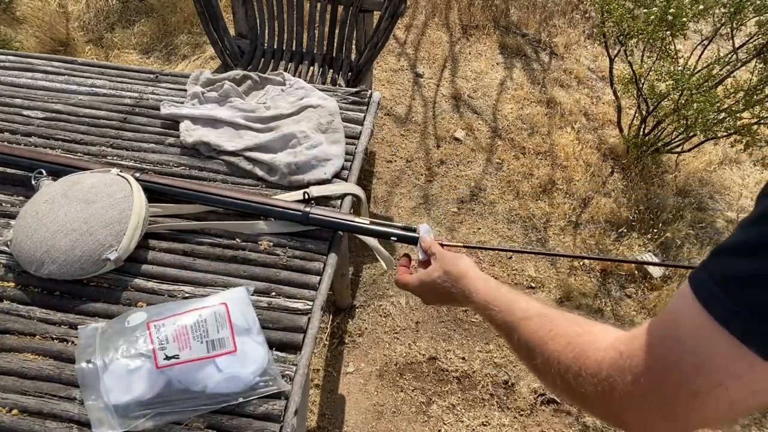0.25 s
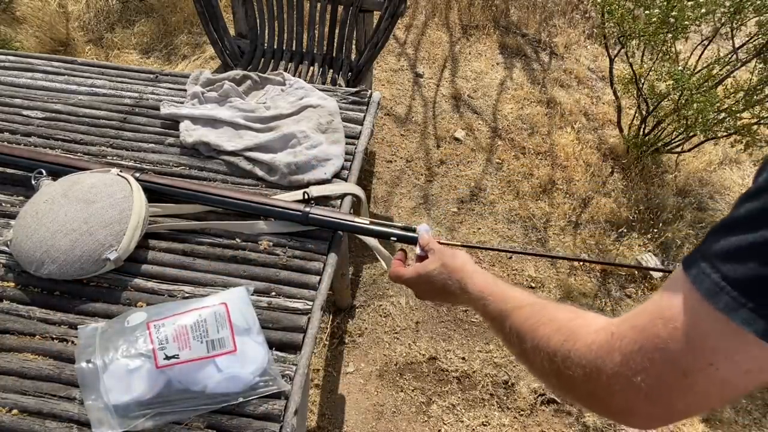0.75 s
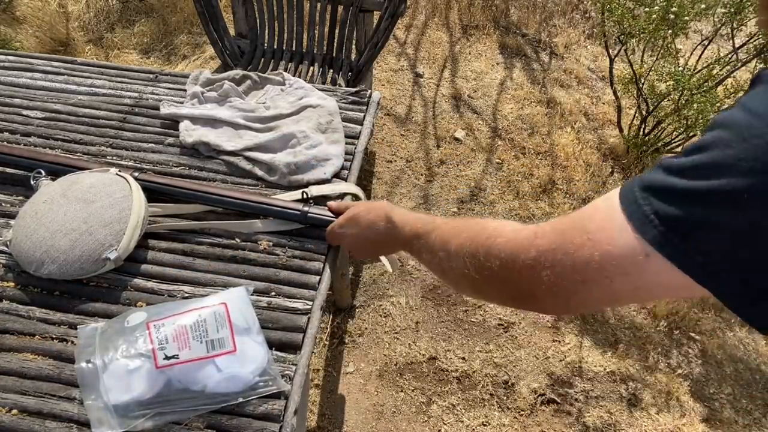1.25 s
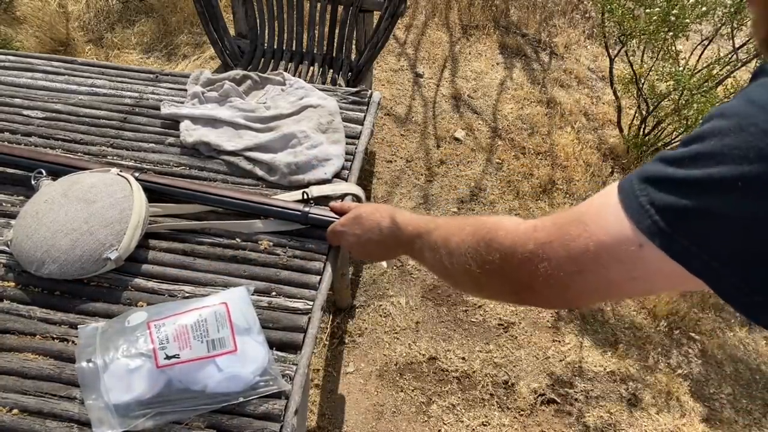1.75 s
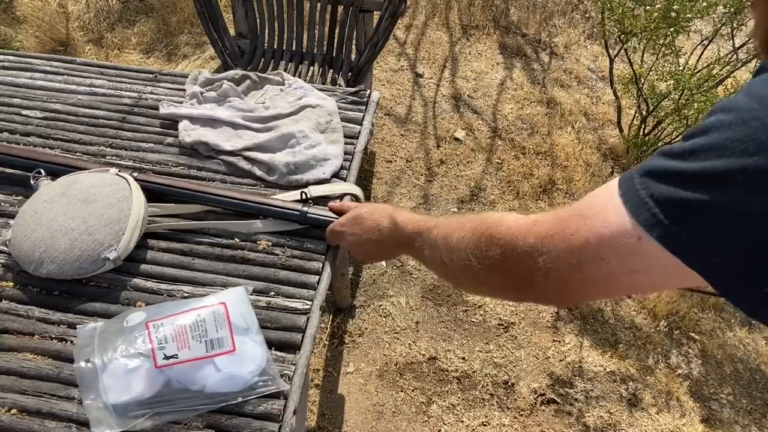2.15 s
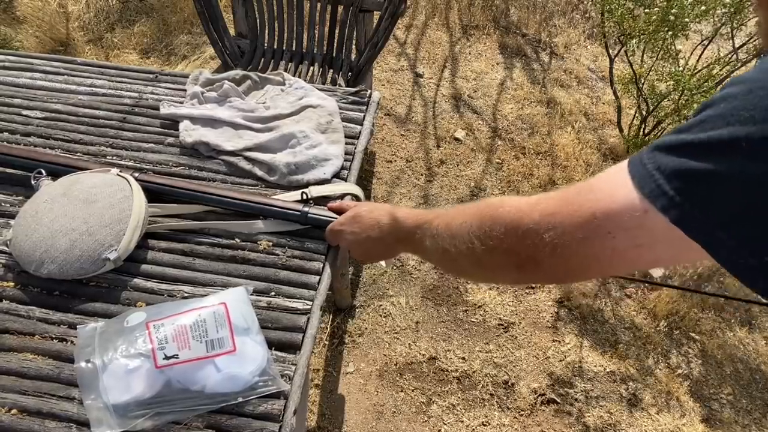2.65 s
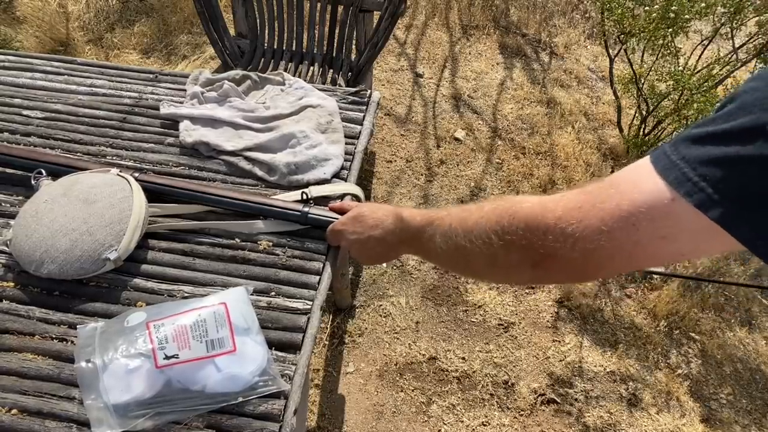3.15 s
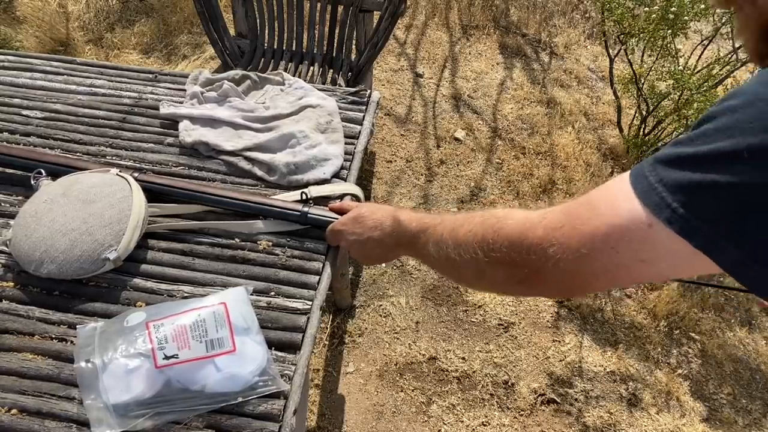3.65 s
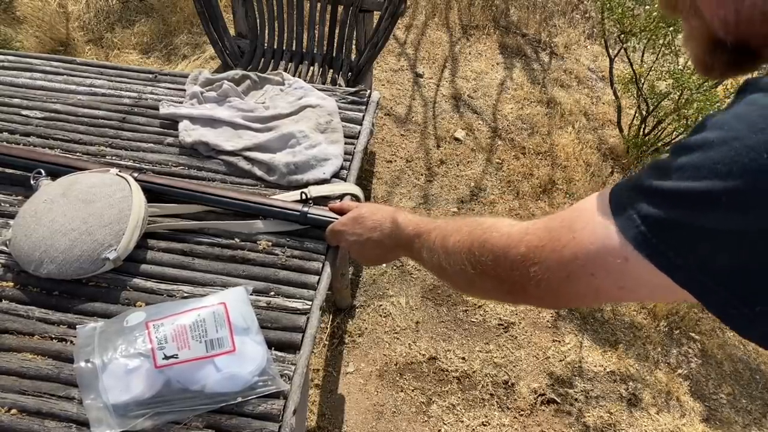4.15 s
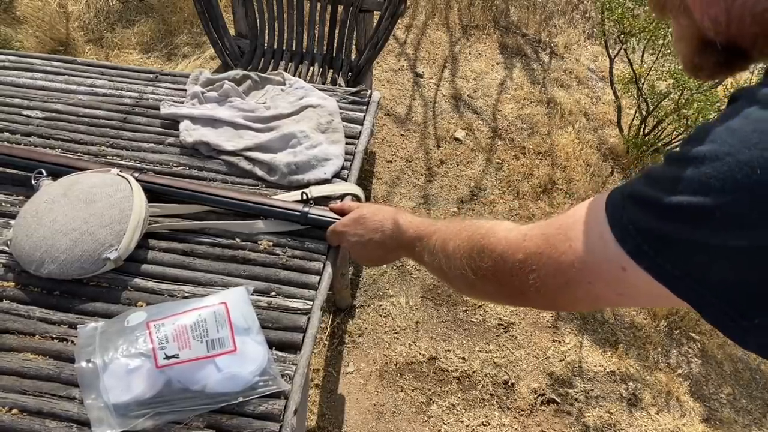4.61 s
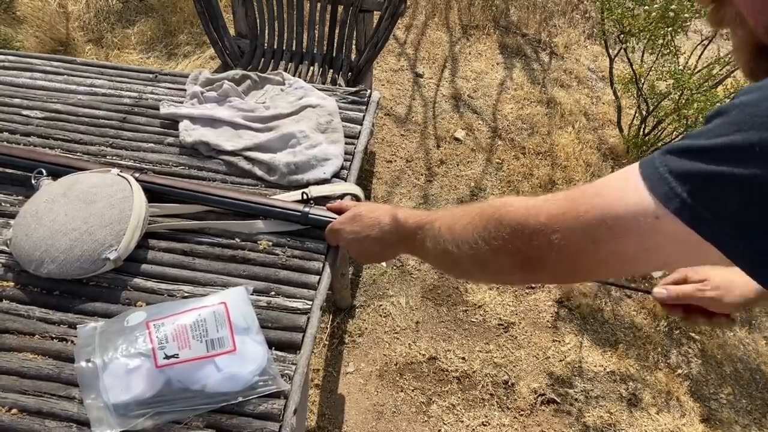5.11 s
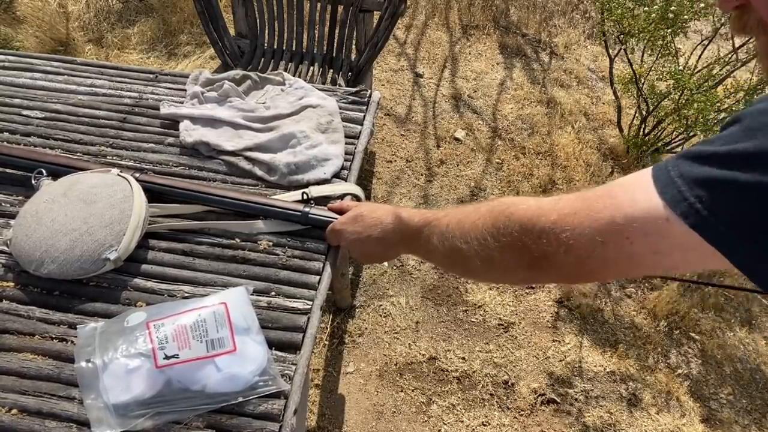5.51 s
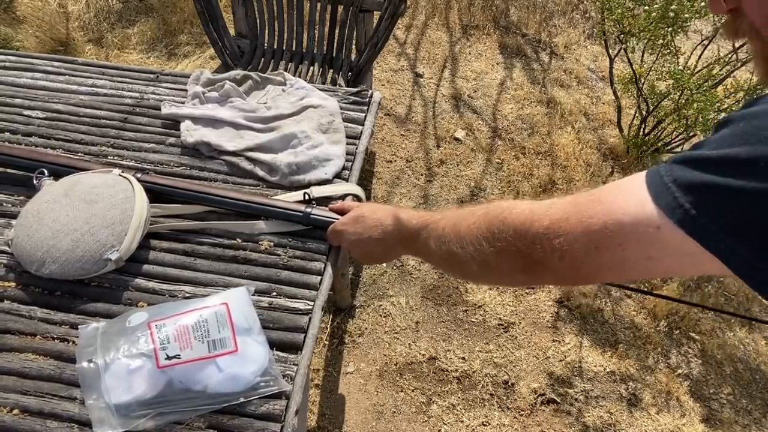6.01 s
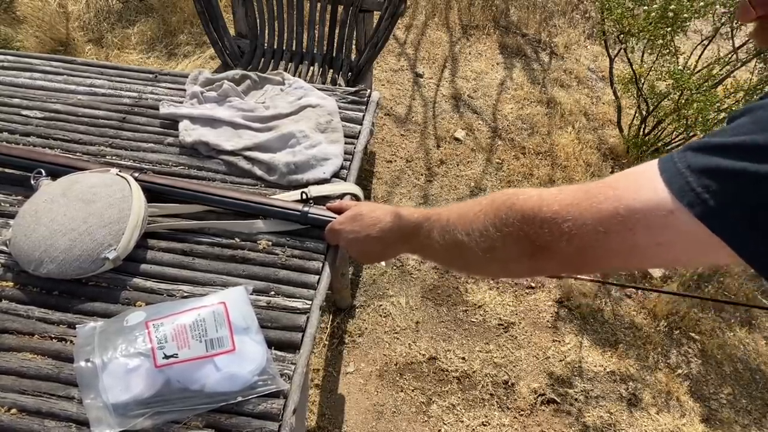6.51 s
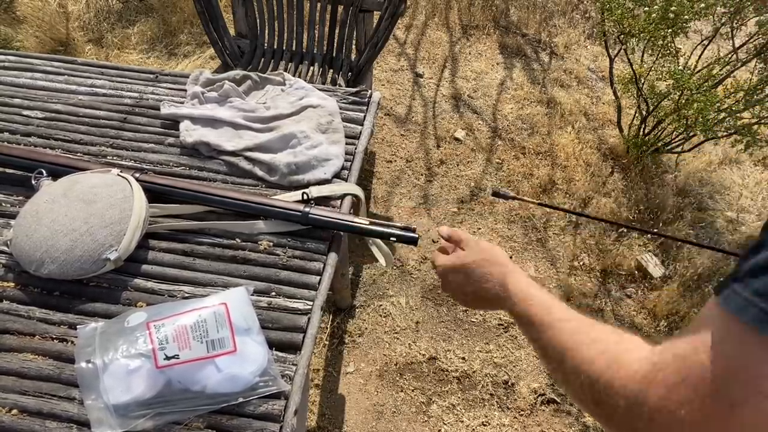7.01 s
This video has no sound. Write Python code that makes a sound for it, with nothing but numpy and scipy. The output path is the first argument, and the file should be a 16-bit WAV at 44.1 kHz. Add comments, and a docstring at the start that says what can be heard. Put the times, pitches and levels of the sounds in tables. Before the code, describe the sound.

A close microphone in a dry open place catches small steel clicks, fingers shifting cloth and dull wooden bumps as a cleaning rod is started in a barrel. Grating strokes with metallic catches come and go, with a bright knock midway. The last stroke ends in an explosive, distorted suction pop, by far the loudest sound, leaving only quiet air and a faint drone.

```python
"""A cloth patch on a thin rod is pushed into a rifle barrel on a slatted table outdoors, worked up and down, pulled out.
Taps, catches and scrapes are noise through resonances of steel barrel and bending rod; cloth is coloured noise.
The patch leaves the muzzle with a pop: dying sines for the air in the bore, then a noisy snap that overloads the
microphone. Wooden slats bump; noise-modulated far traffic hums under a faint hiss, with a few sine insect notes."""
import sys
import numpy as np
from scipy import signal
from scipy.fft import rfft, irfft, next_fast_len
from scipy.io import wavfile
from scipy.ndimage import uniform_filter1d

SR = 44100
rng = np.random.default_rng(int(sys.argv[2]) if len(sys.argv) > 2 else 0)


def store_pcm(level_fs):
    """Save levels as 16-bit WAV."""
    pcm = np.round(np.clip(level_fs, -1, 1) * 32767).astype(np.int16)
    wavfile.write(sys.argv[1], SR, np.atleast_2d(pcm).T)


def volts_from_decibels(level):
    """Turn decibel levels (scalar or array-like) into linear amplitude factors."""
    exponent = np.asarray(level, float) / 20
    return 10 ** exponent


N = 320342


def evened(x):
    """Scales x to rms 1."""
    return x / np.sqrt(np.mean(x ** 2) + 1e-20)


def peaked(x):
    """Scales x so that its loudest 2 ms have rms 1."""
    return x / np.sqrt(uniform_filter1d(x ** 2, size=88).max())


def read(points, hz):
    """Interpolates (Hz, value) points over log frequency."""
    f, value = np.transpose(points)
    return np.interp(np.log(hz + 1), np.log(f + 1), value)


def add(mix, start_s, sound):
    """Adds sound into mix in place, cut at the end."""
    part = mix[round(start_s * SR):][:len(sound)]
    part += sound[:len(part)]


def coloured(x, points):
    """Filters x by a dB spectrum."""
    size = next_fast_len(len(x))
    gain = volts_from_decibels(read(points, np.fft.rfftfreq(size, 1 / SR)))
    return irfft(rfft(x, size) * gain, size)[:len(x)]


def ringing(modes, levels_db, t):
    """One dying sine a mode."""
    return np.array([volts_from_decibels(db - 60 * t / t60) * np.sin(2 * np.pi * hz * t)
                     for (hz, t60), db in zip(modes, levels_db)])


# Still-air spectrum. Each row: frequency in Hz, relative density in dB per Hz.
AIR_COLOUR = [(15, -48), (25, -25.5), (77, -2), (101, 0), (209, -5.5), (289, -12), (444, -15), (741, -17.5),
              (1620, -23.5), (2000, -23.5), (8800, -33), (13500, -33.5), (15500, -36)]


def air():
    """Still-air hiss: steady coloured noise."""
    return volts_from_decibels(-56.5) * evened(coloured(rng.standard_normal(N), AIR_COLOUR))


# Far traffic. Each row: time in seconds, level in dB before a 3.5 dB cut.
TRAFFIC_LEVEL = [(0, -54.5), (.528, -53), (.62, -68), (.74, -56), (.94, -71), (1.05, -56), (1.79, -60),
                 (2.11, -52), (4.13, -63), (4.8, -66), (5.14, -61.5), (5.65, -61), (6.3, -60), (7.26, -60)]


def traffic():
    """A far drone: slow noise on both quadratures makes one pitch waver."""
    drone_hz, wander_hz = 105.8, 18
    s, db = np.transpose(TRAFFIC_LEVEL)
    t = np.arange(N) / SR
    pole = np.exp(-np.pi * wander_hz / SR)
    fuzz = signal.lfilter([1], [1, -pole], rng.standard_normal((2, N)))
    turn = 2 * np.pi * drone_hz * t
    drone = evened(fuzz[0] * np.cos(turn) + fuzz[1] * np.sin(turn))
    return volts_from_decibels(np.interp(t, s, db) - 3.5) * drone


# Steel rod and barrel. Each row: mode in Hz, ungripped width in Hz, mean gain in dB.
STEEL_MODES = [(444, 83, 3.5), (675, 27, 8.5), (777, 8.3, 10), (1060, 43, 5.5), (1216, 94, 3.5),
               (1359.5, 9.8, 10.5), (1538, 25, 6), (1834, 47, -2), (2120, 21, -1), (2320, 28, 7.5),
               (2603, 76, -1), (2832, 200, 6), (3120, 70, 5.5), (3680, 74, -3), (3770, 73, 2.5),
               (4500, 92, 3.5), (5520, 110, 1.5), (8000, 80, -16), (9500, 200, -5.5), (10800, 470, -2)]


def steel(hz, strike_db, damping_hz=0):
    """Direct sound plus each mode, as hard as this contact point drives it; a grip widens the modes."""
    f, width, db = np.transpose(STEEL_MODES)[..., None]
    width = width + damping_hz
    modes = volts_from_decibels(db + strike_db[:, None]) * 1j * width * hz / (f ** 2 - hz ** 2 + 1j * width * hz)
    return 0.98 + modes.sum(0)


TREBLE_LOSS_HZ = 9000  # above about this pitch a touch dies twice as fast


def rod(hz, t60_s):
    """Bending modes, pitch as (order + 1/2) squared, flattened by shear; a chance contact point drives each."""
    m = np.arange(10, 42)[:, None] + .5
    f = 8.48 * m ** 2 / np.sqrt(1 + 1.75e-4 * m ** 2)
    width = np.log(1000) / np.pi / t60_s * (1 + (f / TREBLE_LOSS_HZ) ** 2)
    drive = np.cos(np.pi * m * rng.random())
    return (drive * 1j * width * hz / (f ** 2 - hz ** 2 + 1j * width * hz)).sum(0)


def touch(db, ring_hz, tick_db, t60_s, wood_db, rise_s, rod_db):
    """A short rattle of contact noise rings the barrel; its first blow rings the rod."""
    strike_s, after_db, after_t60_s = 0.00184, -27.5, .16
    t = np.arange(8192) / SR
    hz = np.fft.rfftfreq(len(t), 1 / SR)
    noise = rng.standard_normal(len(t)) * np.minimum(t / rise_s, 1)
    top_hz = max(ring_hz, 1000)
    tilt_db = read([(200, wood_db - 22.5), (430, wood_db), (top_hz, 0),
                    (max(top_hz + 1, 3200), 0.35 * tick_db + 3.5), (5800, tick_db + 5.0), (7500, tick_db - 5.5),
                    (12000, tick_db - 11), (15500, tick_db - 14.5)], hz)
    # the struck spot favours one region
    tilt = volts_from_decibels(tilt_db) * (1 + 1.23 / (1 + ((hz - ring_hz) / 350) ** 2))
    body = steel(hz, 2.5 * rng.standard_normal(len(STEEL_MODES)), 1.2 / t60_s)
    # rifle and table shake on faintly after the touch
    fade = volts_from_decibels(-60 * t / (0.84 * t60_s)) + volts_from_decibels(after_db - 60 * t / after_t60_s)
    bright = hz ** 2 / (hz ** 2 + TREBLE_LOSS_HZ ** 2)
    rattle = rfft(noise * fade) * (1 - bright) + rfft(noise * fade ** 2) * bright
    barrel = irfft(rattle * tilt * body)
    blow = rfft(noise * np.exp(-t / strike_s))
    bend = irfft(blow * tilt * rod(hz, min(0.087, 1.15 * t60_s)))
    both = peaked(barrel) + volts_from_decibels(rod_db) * peaked(bend)
    return volts_from_decibels(db) * peaked(both[:6000])


TAP_RISE_S, TAP_ROD_DB = 0.00093, -2
# Loose rod on barrel and muzzle. Each row: start in seconds, level in dB, strongest ring in Hz,
# relative tick brightness in dB, nominal t60 in seconds (contact noise takes 0.84 of it).
TAP_ROWS = [(.494, -55, 2400, -5, .04), (.917, -55.5, 2200, -24, .08), (.954, -49, 2190, -33, .045),
            (1.117, -50.5, 1900, -18, 0.041), (1.174, -51.5, 2500, 6, .015), (1.195, -51, 2100, -16, .05),
            (1.243, -46.5, 2330, 1, 0.015), (1.332, -48, 3120, -18, 0.06), (1.352, -33, 2410, -18, 0.055),
            (1.388, -51, 2600, -20, 0.037), (1.492, -46, 2565, -22, 0.06), (1.832, -49.5, 1960, -33, 0.057),
            (1.885, -49.5, 2398, -7.5, 0.38), (2.032, -40, 2857, -21, 0.029), (2.067, -46, 2373, -22, .035),
            (2.279, -34, 1540, -15, 0.084), (2.298, -32, 3050, -13.5, .12), (2.361, -36.5, 2770, -2, 0.038),
            (2.431, -40, 2895, -8, 0.047), (2.436, -26.5, 2680, -21, 0.031),
            (2.499, -51.5, 4000, 17, 0.027), (2.548, -38.5, 2340, -18, 0.083),
            (2.624, -46.5, 2530, -23, .14), (2.662, -47.5, 2870, -12, 0.043), (2.775, -38, 2650, -9, 0.055),
            (2.82, -48.5, 2800, -9, 0.042), (2.85, -43, 2320, -34, .077), (2.883, -44, 2510, -11, .063),
            (2.9, -38.5, 1900, -29, 0.061), (2.965, -39.5, 2800, -9, 0.089),
            (2.978, -28.5, 2430, -25, 0.052), (3.0534, -27, 950, -36, 0.0089),
            (3.058, -46, 1250, -36, .045), (3.145, -43.5, 1290, -43, 0.083),
            (3.893, -35.5, 2180, -17, 0.06), (4.147, -37.5, 2210, -21, 0.056),
            (4.44, -38, 2476, -12, 0.065), (4.4463, -18, 2750, -8, 0.059), (4.45, -16, 2500, -11, .04),
            (4.5207, -33.5, 2810, -25, .05), (4.525, -30, 2370, -23, 0.049),
            (4.579, -37.5, 2370, -32, 0.057), (4.675, -45.5, 2570, -34.5, 0.047),
            (4.783, -49.5, 2300, -24.5, 0.26), (4.805, -38, 2600, -17, 0.044),
            (4.8193, -42, 4500, -3, .007), (5.468, -34.5, 2612, -6, 0.062), (5.659, -27, 2290, -17, 0.081),
            (5.894, -38.5, 1980, -21.5, 0.06), (5.943, -46, 2200, -12.5, 0.09),
            (5.951, -44, 1660, -12.5, .044), (5.974, -44.5, 2800, -17, .02),
            (6.015, -22.5, 2320, -14.5, 0.025), (6.06, -51.5, 2450, -15, 0.049),
            (6.08, -43, 1490, -21, .103), (6.507, -36.5, 910, -15.5, 0.068),
            (6.625, -48.5, 3110, -11, 0.055), (6.748, -45, 2360, -11, 0.079)]


def taps():
    """The loose rod knocks barrel and muzzle; harder knocks ring more steel, less wood."""
    out = np.zeros(N)
    for s, db, hz, tick_db, t60_s in TAP_ROWS:
        wood_db = -4.5 - 0.3 * (db + 39.5)
        add(out, s, touch(db, hz, tick_db, t60_s, wood_db, TAP_RISE_S, TAP_ROD_DB))
    return out


def cloth(rows, colour, patchy_db):
    """Cloth noise under a stroke, more or less patchy."""
    s, db = np.transpose(rows)
    t = np.arange(s[0], s[-1], 1 / SR)
    patchy = volts_from_decibels(patchy_db * evened(uniform_filter1d(rng.standard_normal(len(t)), size=400)))
    noise = evened(coloured(patchy * rng.standard_normal(len(t)), colour))
    return s[0], volts_from_decibels(np.interp(t, s, db)) * noise * signal.windows.tukey(len(t), 600 / len(t))


# Cloth spectrum. Each row: frequency in Hz, relative density in dB per Hz.
CLOTH_COLOUR = [(290, -55), (500, -6), (611, 2.5), (686, -22), (748, -6), (2040, -2), (15500, -21)]
# Fingers on the cloth. Each row: start in seconds, length in seconds, peak level in dB.
SHIFT_ROWS = [(1.05, 0.07, -46), (1.14, .07, -56.5), (1.229, 0.032, -52.5), (1.337, .07, -59),
              (1.592, .07, -56), (2.02, 0.037, -65), (2.133, 0.063, -52), (2.231, 0.053, -51.5),
              (2.773, 0.044, -62), (2.868, 0.035, -59), (2.965, 0.044, -61), (6.729, 0.058, -54.5)]


def shifts():
    """Fingers shift the cloth: each shift swells and fades."""
    out = np.zeros(N)
    for start, length, db in SHIFT_ROWS:
        swell = [(start, db - 11), (start + 0.34 * length, db), (start + length, db - 11)]
        add(out, *cloth(swell, CLOTH_COLOUR, patchy_db=0.0))
    return out


def jiggles():
    """Faint chance touches of the rod while the patch is started in the muzzle."""
    first_s, last_s, count = 1.55, 2.7, 7
    out = np.zeros(N)
    for when, size, spot in rng.random((count, 3)):
        sound = touch(-61 + 6 * size, 1810 * (.5 + spot), tick_db=-10, t60_s=0.037, wood_db=-4.5,
                      rise_s=TAP_RISE_S, rod_db=TAP_ROD_DB)
        add(out, first_s + when * (last_s - first_s), sound)
    return out


# Patch held to the muzzle. Each row: time in seconds, level in dB.
RUSTLE_LEVEL = [(1.7, -80), (1.762, -64), (2.2, -63), (2.45, -59.5), (2.76, -67), (2.95, -71), (3.1, -74)]


def rustle():
    """Continuous patchy cloth noise while the patch is held to the muzzle."""
    out = np.zeros(N)
    add(out, *cloth(RUSTLE_LEVEL, CLOTH_COLOUR, patchy_db=3.5))
    return out


# Stock on the slats. Each row: start in seconds, level in dB before 4.5 dB gain and envelope, pitch in Hz.
BUMP_ROWS = [(2.203, -43.5, 397), (2.237, -44, 406), (2.363, -43.5, 458), (2.438, -40, 404),
             (2.517, -46.5, 445), (2.621, -53, 433), (3.487, -43.5, 495), (3.584, -41, 485)]


def bumps():
    """The stock bumps the slats: a soft push rings one wooden slat as a dying sine."""
    out, t = np.zeros(N), np.arange(4000) / SR
    push = 1 - np.exp(-t / 0.0032)
    for s, db, hz in BUMP_ROWS:
        add(out, s, volts_from_decibels(db + 4.5 - 60 * t / 0.058) * push * np.sin(2 * np.pi * hz * t))
    return out


# Push on the rod, a list a stroke. Each row: time in seconds, 800-3500 Hz friction level in dB.
STROKE_LEVELS = [
    [(2.28, -52), (2.305, -40), (2.326, -36), (2.333, -50), (2.341, -34), (2.36, -52)],
    [(3.15, -59.5), (3.2, -42), (3.27, -34), (3.3, -41), (3.335, -44), (3.37, -46.5), (3.548, -48),
     (3.584, -35.5), (3.654, -45), (3.83, -57), (3.93, -49), (4.084, -57), (4.41, -59), (4.45, -46)],
    [(4.86, -65), (5.042, -47), (5.152, -41), (5.23, -42.5), (5.255, -49), (5.35, -43), (5.375, -60),
     (5.41, -61), (5.455, -55.5), (5.53, -60)],
    [(6.07, -60), (6.13, -46), (6.155, -60), (6.2, -44.5), (6.22, -38.5), (6.29, -40.5), (6.31, -57),
     (6.33, -68), (6.4, -69)],
]
# Stroke colours, a list a stroke. Each row: frequency in Hz, relative density in dB per Hz.
STROKE_COLOURS = [
    [(180, -54), (300, -26), (1800, -29), (2270, 0), (3380, -23), (3890, -14), (12000, -38), (15600, -72),
     (22000, -120)],
    [(180, -50), (300, -10.5), (1540, -6.5), (2000, -10.5), (2300, -5.5), (2490, -11.5), (3180, -9.5),
     (12000, -43), (15600, -75), (22000, -120)],
    [(180, -46), (300, -9), (712, -12.5), (769, 0), (857, -17), (1830, -2.5), (3440, -14), (12000, -42),
     (15600, -74), (22000, -120)],
    [(180, -60), (300, -30.5), (402, -3), (629, -20), (669, -10), (2300, -3), (12000, -40), (15600, -74),
     (22000, -120)],
]


def slide(rows, colour):
    """Friction noise catches and slips in lumps; the modes wax and wane as the contact moves along the bore."""
    scrape_hz, roam, rumble_db, catches_per_s, lump_s = 1900, 0.19, 0.5, 260, 0.0036
    s, db = np.transpose(rows)
    t = np.arange(s[0], s[-1], 1 / SR)
    db = np.interp(t, s, db)
    sizes = volts_from_decibels(2.5 * np.minimum(rng.exponential(1, len(t)), 3))
    impulses = sizes * (rng.random(len(t)) < catches_per_s / SR)
    decayed = signal.lfilter([1], [1, -np.exp(-1 / (lump_s * SR))], impulses)
    lumps = uniform_filter1d(decayed, size=90)
    chatter = volts_from_decibels(0.08 * np.clip(db + 47, 0, 20) - 4.5)  # a harder push chatters more
    drive = rng.standard_normal(len(t) + 512) * np.pad(1 + chatter * lumps, (0, 512))

    hz, at, z = signal.stft(drive, SR, nperseg=512, noverlap=384)
    wander = evened(uniform_filter1d(rng.standard_normal(len(at)), size=20))
    centre = scrape_hz * np.exp(roam * wander)
    near = 1 + 1.0 / (1 + ((hz[:, None] - centre) / 400) ** 2)
    low = np.clip(np.log2(900 / (hz + 1)), 0, 1)[:, None]  # table rumble under the scrape
    z = z * near * volts_from_decibels(read(colour, hz)[:, None] + low * rumble_db)
    rub = signal.istft(z, SR, nperseg=512, noverlap=384)[1]

    hz, out = np.fft.rfftfreq(len(rub), 1 / SR), 0
    for k in range(3):  # three contact regions cross-fade
        share = np.cos(np.pi * (np.arange(len(rub)) / SR * 2.577 + k / 3))
        barrel = steel(hz, 2.7 * rng.standard_normal(len(STEEL_MODES)), damping_hz=21.9)
        body = barrel + volts_from_decibels(7.5) * rod(hz, 0.06)
        out = out + irfft(rfft(rub * share) * body, len(rub))
    out = out[:len(t)]
    band = signal.butter(2, [800, 3500], "band", fs=SR, output="sos")
    steady = np.sqrt(uniform_filter1d(signal.sosfilt(band, out) ** 2, size=9000))
    return s[0], volts_from_decibels(db) * out / steady * signal.windows.tukey(len(t), 400 / len(t))


def slides():
    """The rod scrapes the bore in every stroke."""
    out = np.zeros(N)
    for rows, colour in zip(STROKE_LEVELS, STROKE_COLOURS):
        add(out, *slide(rows, colour))
    return out


# Tight patch on the bore wall, a list a stroke. Each row: time in seconds, level in dB.
WIPE_LEVELS = [
    [(3.17, -70), (3.3, -56.5), (3.508, -53), (3.66, -53), (3.718, -49), (3.8, -52), (4.068, -54),
     (4.252, -55), (4.29, -60), (4.44, -56.5)],
    [(4.8, -73), (4.82, -58), (4.87, -65.5), (5.12, -61), (5.145, -54), (5.216, -57), (5.344, -55),
     (5.39, -66)],
    [(6.09, -70), (6.11, -59), (6.178, -72), (6.244, -63), (6.3, -72), (6.4, -57)],
]
# Wipe spectrum. Each row: frequency in Hz, relative density in dB per Hz.
WIPE_COLOUR = [(350, -26), (600, -7), (809, -10.5), (1180, -1.5), (1660, -9.5), (2310, -7.5), (2500, -8),
               (3200, -4.5), (5510, -10), (8860, -22), (12100, -23), (15500, -34.5)]
# Delayed copies of the wipe, which comb its spectrum. Each row: total delay in seconds, gain in dB.
WIPE_ECHOES = [(.0039, -7), (.0043, -9)]


def wipes():
    """The tight patch wipes the bore wall: cloth noise, direct and in two delayed copies."""
    out, wipe = np.zeros(N), np.zeros(N)
    for rows in WIPE_LEVELS:
        add(wipe, *cloth(rows, WIPE_COLOUR, patchy_db=1.5))
    for delay_s, db in [(0.0019, 0.02), *WIPE_ECHOES]:
        add(out, delay_s, volts_from_decibels(db) * wipe[:N - SR // 2])
    return out


# Pushed rod in the bore. Each row: start in seconds, level in dB, strongest ring in Hz,
# relative tick brightness in dB, nominal t60 in seconds (contact noise takes 0.84 of it).
CATCH_ROWS = [(3.182, -31.5, 1780, -21.5, 0.25), (3.218, -33, 1480, -25, 0.13),
              (3.236, -32, 1490, -26, 0.066), (3.277, -28.5, 2330, -28, 0.15),
              (3.291, -30, 2320, -32, 0.074), (3.348, -39, 2210, -34, 0.13), (3.38, -38, 1290, -19, 0.14),
              (3.404, -34.5, 1490, -21, 0.074), (3.632, -36.5, 1060, -20, .11), (3.72, -42, 2300, -13, .08),
              (4.975, -45.5, 1690, -24, .047), (5.008, -37.5, 1910, -31, .073),
              (5.075, -40.5, 760, -30, 0.056), (5.104, -37, 1740, -27, 0.068), (5.149, -39, 1740, -22, 0.1),
              (5.162, -35, 1750, -32, .1), (5.18, -39, 1920, -27, .15), (5.231, -40, 1440, -19, 0.032),
              (5.275, -35.5, 2650, -26, .05), (5.292, -32, 2400, -25, 0.036),
              (5.306, -34.5, 2300, -26, 0.091), (5.331, -32, 2320, -27, 0.11),
              (6.105, -44.5, 2300, -9, 0.048), (6.115, -38.5, 2250, -21, 0.061),
              (6.13, -42, 1500, -21.5, 0.07), (6.168, -42, 1488, -26, 0.056),
              (6.188, -41, 1500, -20, 0.074), (6.208, -33, 2300, -17.5, 0.092),
              (6.223, -30.5, 1470, -15.5, .05), (6.24, -31.5, 1100, -13.5, 0.048),
              (6.254, -35.5, 2220, -18.5, .1), (6.272, -35, 2200, -22.5, .05),
              (6.282, -32.5, 2260, -24.5, .04), (6.291, -36, 1464, -26, .03)]


def catches():
    """The pushed rod catches in the bore; a catch under load builds up."""
    out = np.zeros(N)
    for s, db, hz, tick_db, t60_s in CATCH_ROWS:
        add(out, s, touch(db, hz, tick_db, t60_s, wood_db=-5, rise_s=.0025, rod_db=-4))
    return out


# Insect. Each row: start in seconds, length in seconds, pitch in Hz, peak level in dB.
CHIRP_ROWS = [(3.47, 0.052, 7800, -76), (5.767, 0.04, 7780, -66), (5.808, 0.054, 7740, -66)]


def insect():
    """A few thin notes, each a faded sine."""
    out = np.zeros(N)
    for s, length, hz, db in CHIRP_ROWS:
        t = np.arange(0, length, 1 / SR)
        add(out, s, volts_from_decibels(db) * np.sin(2 * np.pi * hz * t) * signal.windows.tukey(len(t), .4))
    return out


POP_S = 6.4083  # suction lets go
# Air in the bore, shut at the breech, near odd multiples. Each row: mode in Hz, t60 in seconds.
BORE_MODES = [(87, .3), (272, .165), (456, .13), (645, .13), (833, .1), (1020, .11), (1209, .08),
              (1392, .08), (1562, .07)]
# Bore modes in the same order. Each entry: level in dB.
BORE_LEVELS = [-13, -8, -16, -20.5, -24, -13, -20, -22, -14.5]


def pop():
    """The vacuum behind the patch collapses and rings the air in the bore."""
    out, t = np.zeros(N), np.arange(SR // 2) / SR
    swell = 1 - np.exp(-t / 0.00026)
    inward = -(-1.) ** np.arange(len(BORE_MODES))  # air rushes in first
    add(out, POP_S, swell * (inward @ ringing(BORE_MODES, BORE_LEVELS, t)))
    return out


# Snap spectrum. Each row: frequency in Hz, relative density in dB per Hz.
CRACK_COLOUR = [(180, -36), (300, -2.5), (1780, -2.5), (2030, -7.5), (5040, -15.5), (5850, -17),
                (8270, -22), (10900, -17.5), (15500, -32.5)]
# Ringing of the snap in the bore, many modes near multiples of 183 Hz. Each row: mode in Hz, t60 in seconds.
SNAP_MODES = [(197, .09), (549, .065), (733, .065), (913, .065), (1104, .065), (1292, .06), (1480, .05),
              (1650, .05), (1917, .045), (2035, .055), (2250, .04), (2861, .04), (3081, .04), (3326, .035)]
# Snap modes in the same order. Each entry: level in dB.
SNAP_LEVELS = [-15, -7, -7, -9.5, -9, -10.5, -17.5, -17, -18.5, -9.5, -19.5, -18.5, -9.5, -18.5]
# Settling. Each row: frequency in Hz, t60 in seconds.
SETTLE_T60 = [(300, 0.079), (1000, 0.099), (2500, 0.087), (5500, 0.1), (9000, 0.077), (14000, 0.072)]


def crack():
    """A puff, then the patch snaps free: dying sines ring in the bore under pulsed, settling noise."""
    crack_s, pulse_s = 6.4150, 0.0072  # pulse_s: spacing of the pulses in the snap's noise
    out, t = np.zeros(N), np.arange(SR // 2) / SR
    puff = evened(coloured(rng.standard_normal(220), CRACK_COLOUR)) * np.hanning(220)
    add(out, POP_S + 0.0014, volts_from_decibels(-14) * puff)
    add(out, crack_s, ringing(SNAP_MODES, SNAP_LEVELS, t).sum(0))

    noise = coloured(rng.standard_normal(len(t)), CRACK_COLOUR)
    noise = coloured(noise, [(900, -9.0), (2400, -1.5)])
    hz, at, z = signal.stft(noise, SR, nperseg=128)
    settle = volts_from_decibels(-60 * at / read(SETTLE_T60, hz)[:, None])
    tail_db = read([(2500, -27), (9000, -39.5)], hz)[:, None]
    tail = volts_from_decibels(tail_db - 60 * at / 0.44)
    shake = signal.istft(z * (settle + tail), SR, nperseg=128)[1][:len(t)]
    shake *= 1 + 2.1 * np.exp(-(t / 0.013) ** 2)  # the rod clatters at the crown, then all settles
    shake *= 0.63 + np.exp(-(t % pulse_s) / 0.0021)
    add(out, crack_s, volts_from_decibels(-2) * shake / np.sqrt(np.mean(shake[:200] ** 2)))
    return out


def scene():
    """All sources at one microphone."""
    mix = air() + traffic()
    mix += taps() + shifts() + jiggles() + rustle() + bumps()
    mix += slides() + wipes() + catches() + insect()
    mix += pop() + crack()
    return mix[None]


def roll_off(x):
    """The treble ends steeply here."""
    return signal.sosfilt(signal.butter(12, 15630, fs=SR, output="sos"), x)


def record(dry):
    """The microphone input clips at full scale, as on the pop."""
    overloaded = np.clip(dry, -1, 1)
    return roll_off(overloaded)


dry = scene()
out = record(dry)
store_pcm(out)
```